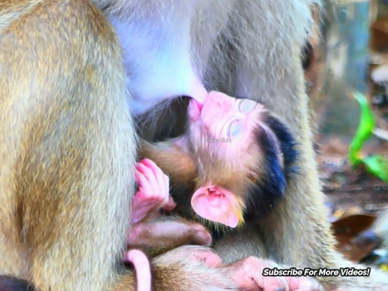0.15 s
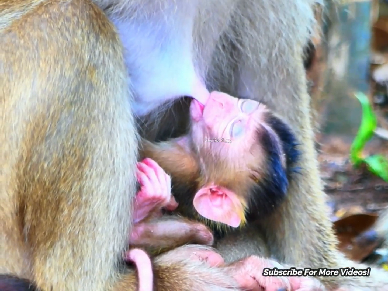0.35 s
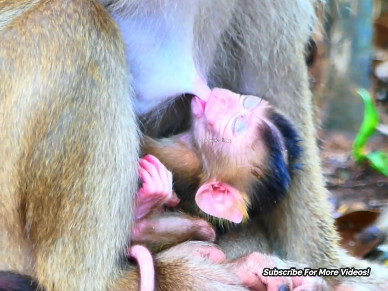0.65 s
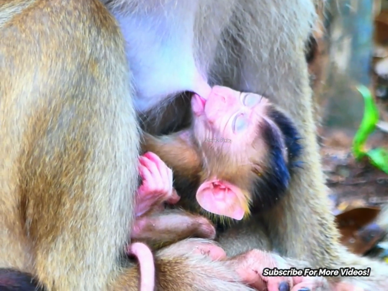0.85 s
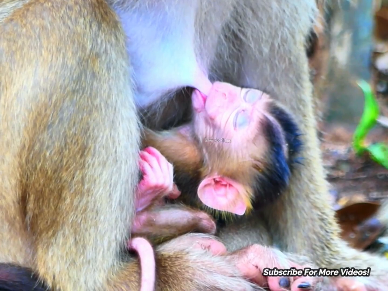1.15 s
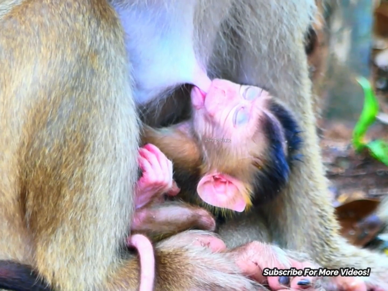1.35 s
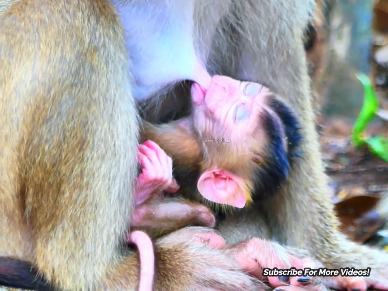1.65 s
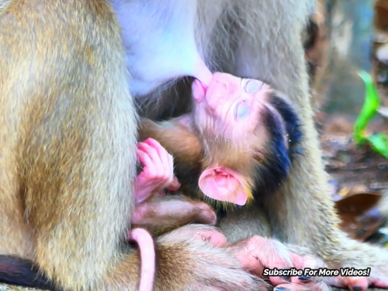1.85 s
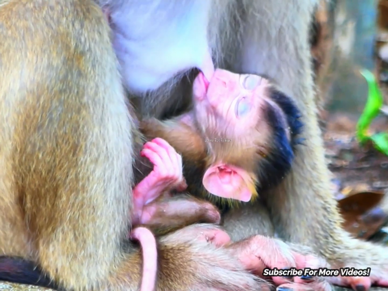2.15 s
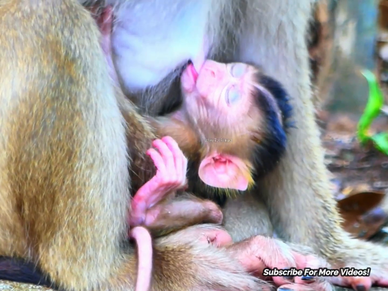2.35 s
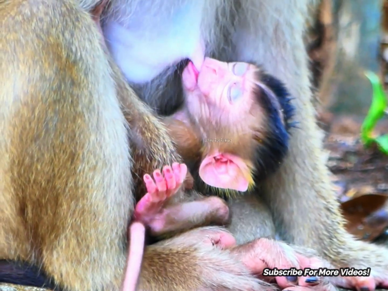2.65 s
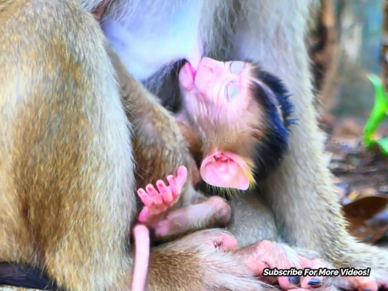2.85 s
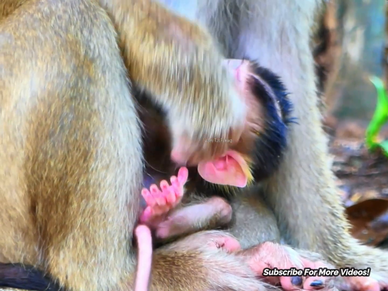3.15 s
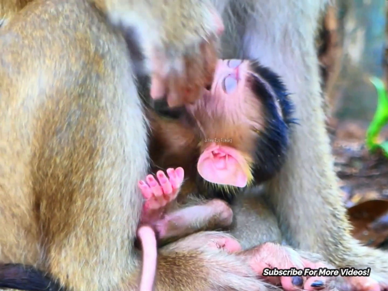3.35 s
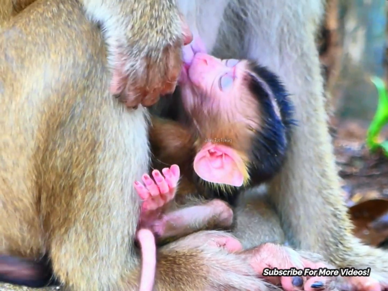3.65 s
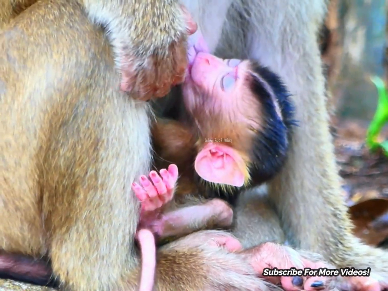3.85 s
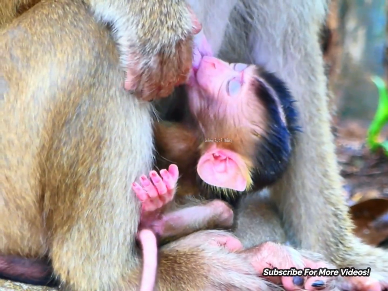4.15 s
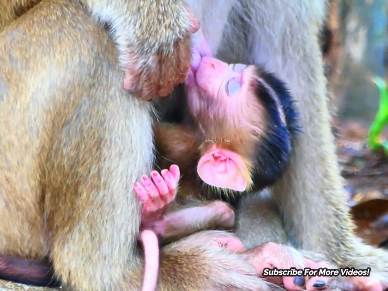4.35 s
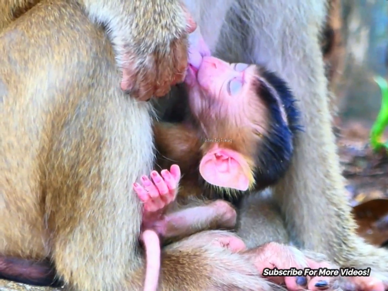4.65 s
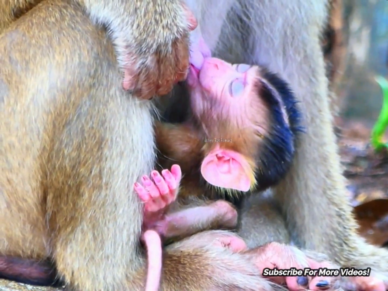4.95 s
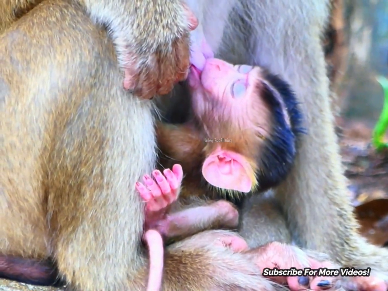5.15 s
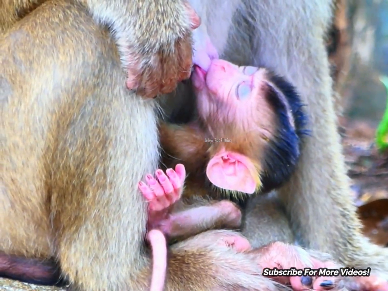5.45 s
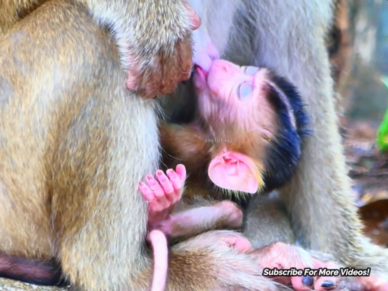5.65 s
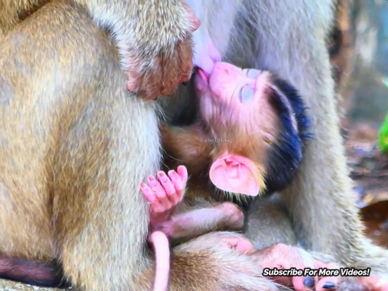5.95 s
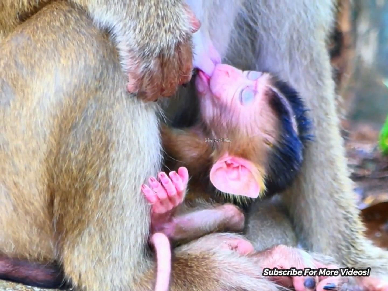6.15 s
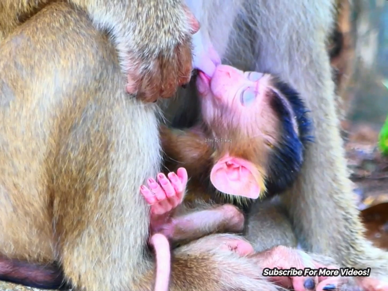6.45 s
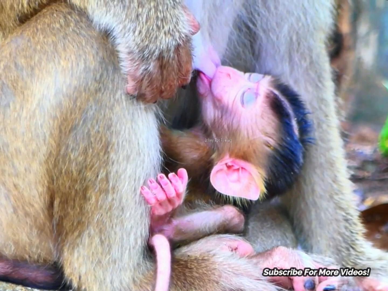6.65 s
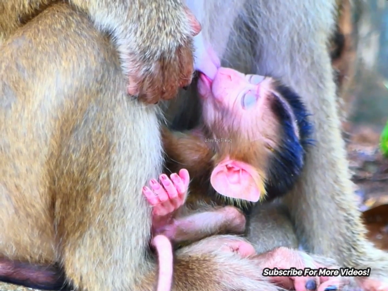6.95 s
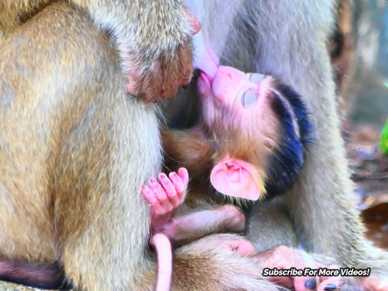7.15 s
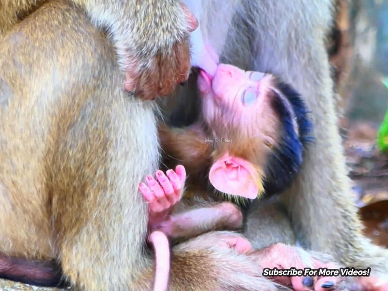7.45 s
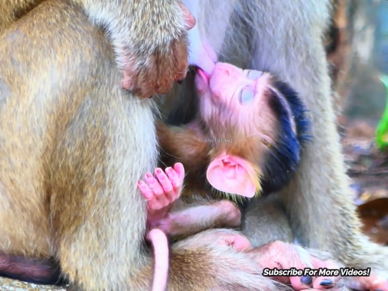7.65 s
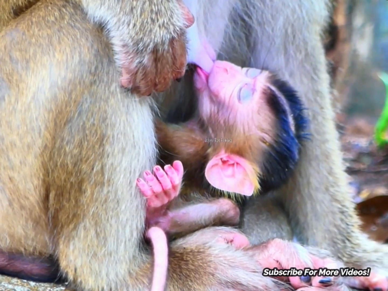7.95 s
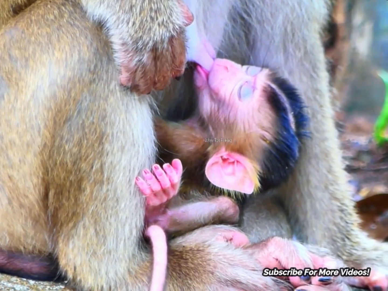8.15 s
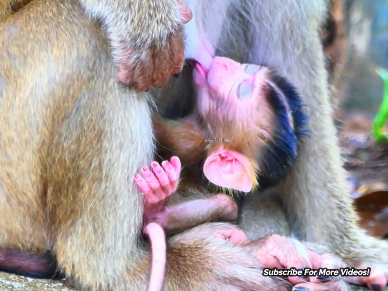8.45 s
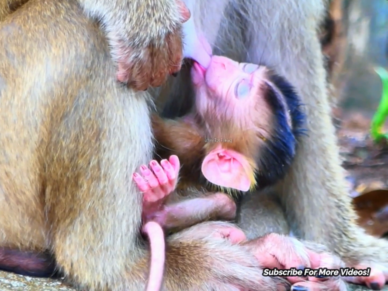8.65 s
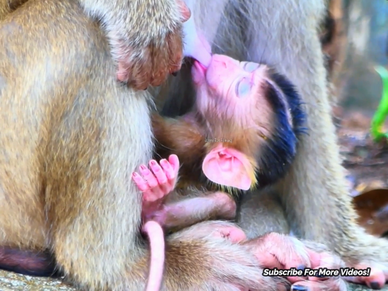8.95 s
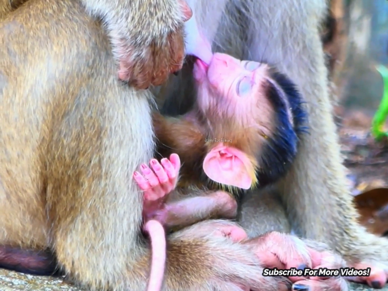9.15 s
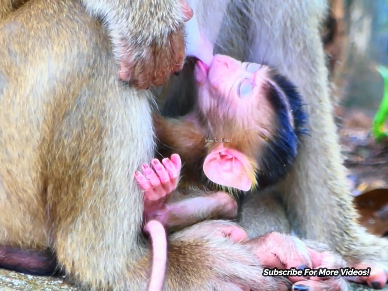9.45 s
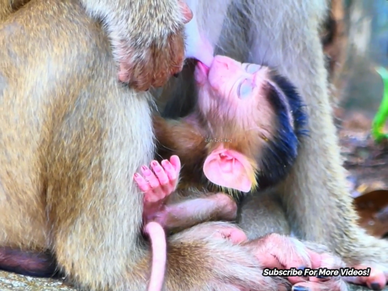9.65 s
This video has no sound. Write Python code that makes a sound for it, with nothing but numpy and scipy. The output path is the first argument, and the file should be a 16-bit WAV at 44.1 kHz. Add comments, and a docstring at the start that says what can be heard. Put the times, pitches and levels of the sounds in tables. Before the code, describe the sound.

Outdoor woodland birdsong: two bursts of rapid bright chirps, soft hoots to the left, sharp falling calls, faint insect tones and dry leaf ticks.

```python
"""Birds in a tropical wood

A near bird runs off quick rising chirps and low two-voiced chips; another hoots softly on the left.
Small birds further off slur falling whistles that ring among the trees: all are gliding, near-pure tones.
Dry leaves stir and tick as shaped noise, with a few hissing rasps made of noise through resonances,
over a soft outdoor wash of coloured noise and thin insect tones made of narrow bands of noise."""
import sys
import numpy as np
from scipy import signal
from scipy.fft import rfft, irfft, next_fast_len
from scipy.io import wavfile
from scipy.ndimage import uniform_filter1d, map_coordinates

SR = 44100
rng = np.random.default_rng(int(sys.argv[2]) if len(sys.argv) > 2 else 0)


def materialize(psi):
    """Save the field psi as 16-bit PCM at rate SR to the path in sys.argv[1].

    A 1-D psi becomes a single channel; in a 2-D psi each row is a channel.
    """
    bounded = np.clip(np.atleast_2d(psi).T, -1, 1)
    quanta = np.round(bounded * 32767).astype(np.int16)
    wavfile.write(sys.argv[1], SR, quanta)


N = 432621
TIME = np.arange(N) / SR  # t/s

# Source levels below apply before the note contours and the response of the wood.
# Note contours: share of the note's length, pitch (0 = low f, 1 = top f), level/dB
CHIRP_CONTOUR = [(0, 0, -23), (.2, .14, -14), (.45, .28, -8.5), (.63, .6, 0), (.82, 1, -2.5), (.92, .9, -6),
                 (1, .6, -16)]
CHIP_CONTOUR = [(0, 0, -17), (.2, .05, -11), (.34, .7, -3), (.43, 1, -3), (.58, .52, 0), (.8, .28, -5),
                (1, .2, -13)]
HOOT_CONTOUR = [(0, 0, -5), (.2, .8, 1), (.45, 1, 1), (.8, .7, 0), (1, .1, -5)]
TSEW_CONTOUR = [(0, .9, -21), (.3, 1, -11), (.52, .85, -3), (.78, .3, -5), (1, 0, -8)]
FALLING_CONTOUR = [(0, 0.94, -10), (0.298, 0.68, -9), (.58, 0.7, -10.5), (0.749, 0.39, -12),
                   (0.882, .12, -7.5), (0.999, -0.18, -17.5)]

# Rising chirps of the near bird, in two runs that warm up and close on a weak note:
# t/s, low f/Hz, top f/Hz, level/dB
CHIRPS = [(0.1, 2620, 3240, -15.5), (.169, 2660, 3368, -14), (.24, 2680, 3354, -13),
          (.312, 2720, 3286, -13), (.388, 2750, 3190, -12), (0.461, 2850, 3040, -24),
          (5.477, 2300, 3280, -24.5), (5.557, 2560, 3360, -15.5), (5.633, 2660, 3400, -13.5),
          (5.71, 2700, 3296, -13), (5.79, 2720, 3322, -15.5), (5.868, 2740, 3216, -25.5)]
CHIRP_S = .05
# A short, soft trial chirp before each run: t/s, length/s, low f/Hz, top f/Hz, level/dB
TRIAL_CHIRPS = [(.037, 0.0287, 2580, 3450, -23.5), (5.392, 0.033, 2300, 2730, -34.5)]
# Low arched chips, in two runs: t/s, length/s, top f/Hz, level/dB, upper voice relative to lower/dB
CHIPS = [(0.555, 0.023, 2645, -22.5, -6), (0.605, .027, 2550, -21, -27), (0.665, 0.03, 2535, -20, -30),
         (0.719, 0.031, 2420, -22, -16), (0.785, .027, 2480, -23.5, -25), (.864, .022, 2500, -37.5, -31),
         (3.964, 0.028, 2550, -47, 5.5), (4.012, 0.027, 2190, -33, -11), (4.074, 0.028, 2286, -27, -21),
         (4.144, 0.0234, 2464, -25.5, -14), (4.187, 0.04, 2020, -35, -14), (4.225, 0.021, 2490, -25, -7),
         (4.302, .022, 2710, -25, -20), (4.45, 0.025, 2630, -47, 2.5)]
CHIP_LOW_HZ, UPPER_VOICE_RATIO = 1568, 1.55
# A lower chirp in answer: t/s, length/s, low f/Hz, top f/Hz, level/dB
ANSWER = [(9.71, 0.0373, 1560, 2050, -32)]

# Hooted phrases: t/s, level/dB, level of the closing dip/dB
PHRASES = [(.05, -27.5, -32), (1.59, -30, -44.5), (5.15, -30.5, -32.5), (7.556, -33.5, -39)]
# Flourish that opens every phrase: t into the phrase/s, length/s, low f/Hz, top f/Hz, relative level/dB
FLOURISH = [(0, 0.034, 920, 998, -7), (.018, 0.035, 1134, 1236, 0), (.062, 0.084, 1131, 1210, -3)]
DIP_AFTER_S, DIP_S, DIP_LOW_HZ, DIP_TOP_HZ = .161, 0.021, 857, 1006  # a low dip ends the flourish
# Single hoots: t/s, length/s, level/dB
HOOTS = [(.3, 0.03, -31), (.412, 0.09, -32.5), (.675, .07, -34.5), (1.875, 0.077, -34.5),
         (2.08, 0.066, -37), (2.57, 0.1, -45), (5.52, .073, -39), (7.933, 0.075, -39.5)]
HOOT_LOW_HZ, HOOT_RISE_HZ_PER_S = 1087, 1200  # the longer a hoot, the higher it arches

# Sharp, steeply falling calls: t/s, length/s, low f/Hz, top f/Hz, level/dB
TSEWS = [(.49, .07, 3320, 4715, -33), (.522, 0.03, 3800, 4920, -27), (.982, 0.042, 4780, 6700, -21.5),
         (1.032, .056, 3740, 5000, -25), (1.585, 0.033, 3910, 4510, -31), (1.655, 0.023, 4990, 5860, -41),
         (2.603, 0.047, 4800, 6350, -23), (4.39, 0.03, 5870, 7200, -37), (4.918, 0.037, 4740, 6580, -25.5),
         (6.472, 0.051, 4670, 6530, -27), (8.118, 0.06, 4530, 6310, -27)]
# Long falling whistles: t/s, slide length/s, drop length/s, top f/Hz, slide level/dB, drop level/dB
SLURS = [(0, 0.11, 0.043, 5030, -48, -34), (.6, .11, 0.034, 4900, -52, -31.5),
         (1.282, 0.17, 0.028, 5020, -63, -44), (1.681, 0.094, 0.052, 4910, -56, -60),
         (2.041, 0.14, 0.062, 5150, -61, -41.5), (2.201, 0.096, 0.044, 5380, -50.5, -47),
         (2.388, 0.084, 0.024, 5160, -60, -55), (2.791, 0.14, 0.063, 5260, -51.5, -38.5),
         (3.219, 0.12, 0.047, 5370, -55, -76), (3.41, 0.14, 0.052, 5220, -54, -42),
         (3.677, 0.082, 0.051, 5540, -51.5, -49), (3.925, 0.053, 0.039, 5690, -60, -48),
         (4.218, 0.076, 0.033, 4750, -48, -46), (4.47, 0.13, 0.036, 5400, -53.5, -44),
         (5.08, 0.08, 0.03, 5300, -45, -48), (5.14, 0.094, 0.053, 5020, -45.5, -41),
         (5.519, .11, 0.044, 5430, -45, -41), (5.68, 0.051, 0.056, 5300, -52, -65),
         (5.83, 0.095, 0.034, 4930, -54, -40), (6.153, 0.15, 0.089, 5430, -47.5, -56),
         (6.58, .16, 0.028, 5030, -58.5, -43), (6.83, 0.17, 0.036, 5340, -53.5, -69),
         (7.19, 0.12, 0.0393, 5160, -52, -41), (7.55, 0.12, 0.033, 4710, -60, -46),
         (7.69, 0.14, 0.049, 5280, -46, -42), (8.21, 0.098, 0.058, 5390, -42.5, -37),
         (8.329, 0.088, 0.021, 5040, -50, -45), (8.845, 0.14, 0.086, 5310, -47, -39.5),
         (9.254, 0.083, 0.049, 5320, -50.5, -33), (9.662, 0.14, 0.027, 5300, -53.5, -44)]
SLUR_END_SHARE, SLUR_KNEE_SHARE = .63, .88  # last pitch and pitch at the knee, as shares of the top
SLUR_FADE_IN_DB, SLUR_FADE_OUT_DB = -12, -10.5  # first point against the slide, last against the drop
# Onsets of one tiny bird's peeps, about two a second: t/s
PEEP_TIMES = [.47, 1.24, 1.766, 2.275, 2.846, 3.322, 3.829, 4.774]
PEEP_S, PEEP_HZ, PEEP_DB = 0.0537, 7230, -49.5
PEEP_ARCH = 0.0393  # share by which a thin note rises and falls
# Stray thin notes of other small birds: t/s, length/s, top f/Hz, level/dB
THIN_NOTES = [(.06, 0.041, 7240, -48), (.465, 0.053, 5820, -40.5), (1.21, 0.029, 5890, -39.5),
              (1.52, 0.14, 6020, -47), (1.85, 0.058, 9580, -50.5), (3.7, .07, 9500, -57),
              (6.21, 0.058, 9600, -54), (7.92, 0.052, 9640, -55), (7.46, 0.091, 5660, -48),
              (9.2, 0.033, 4120, -44)]

# Far calls, short or held: t/s, length/s, low f/Hz, top f/Hz, level/dB
FAR_CALLS = [(3.0, 0.38, 1500, 1680, -58.5), (3.2, 0.18, 720, 820, -58), (3.52, 0.083, 1220, 1290, -54),
             (3.6, 0.98, 1668, 1712, -58), (4.68, 0.38, 1250, 1366, -56), (4.98, 0.071, 960, 1028, -50.5),
             (6.15, 0.21, 590, 684, -60), (6.2, 0.39, 1290, 1370, -58.5), (6.42, 0.15, 1020, 1120, -51.5),
             (6.8, 0.44, 941, 1035, -51), (8.32, 0.67, 943, 1055, -52)]
# Far, short falling calls: t/s, length/s, low f/Hz, top f/Hz, level/dB
FAR_DROPS = [(2.16, 0.075, 1850, 2305, -44), (4.42, 0.029, 1716, 2910, -35.5),
             (7.33, 0.095, 2034, 2690, -45), (9.28, 0.049, 1483, 1810, -38.5), (9.5, 0.05, 1386, 2134, -39)]
# Bouts of low, distant chatter: first t/s, last t/s, nominal top f/Hz, mean level/dB
CHATTER = [(0.9, 2.603, 2303, -68), (2.65, 3.95, 2200, -57.5), (5.995, 7.997, 2500, -78),
           (8.102, 9.248, 2706, -59)]

# Hissing rasps: t/s, length/s, level/dB
RASPS = [(0.678, 0.042, -42.5), (0.716, 0.059, -36.5), (.752, 0.021, -33.5), (5.901, 0.038, -37.5)]
# Resonances of a rasp: f/Hz, width/Hz, level/dB
RASP_RESONANCES = [(3700, 2400, -4.5), (5760, 370, -4), (6340, 310, -1.5), (9100, 730, -8),
                   (10470, 360, -13.5), (6100, 5500, -5)]
# Dry leaves stirring: t/s, length/s, level before colouring/dB
RUSTLES = [(0.2, 0.065, -42.5), (0.253, 0.037, -36), (1.863, 0.062, -68), (3.073, 0.066, -55.5)]
# Spectrum of the leaves: f/Hz, level/dB
LEAF_COLOUR = [(600, -38), (1000, 3), (2200, -12.5), (3700, 2), (5000, -8), (6700, -2), (8200, -12),
               (10600, -10.5), (11800, -31), (15000, -23)]
# Small dry ticks: t/s, level/dB, centre f/Hz, width/Hz
TICKS = [(0.208, -31, 10700, 2000), (5.022, -18.5, 4500, 1300), (6.972, -25.5, 8400, 9100)]
TICK_DECAY_S, TICK_GRIT_DB = 0.0028, -8.5  # the crumbling that follows each snap
# Soft scuffs and bumps: t/s, length/s, centre f/Hz, level/dB
BUMPS = [(3.59, 0.17, 149.4, -51.5), (3.58, 0.19, 313, -51), (5.513, .17, 65, -63), (9.741, 0.1, 1420, -39)]

# Spectrum of the outdoor wash: f/Hz, relative level per hertz/dB
WASH_COLOUR = [(15, -56.5), (25, -27.5), (119, -8), (215, -9), (289, -5), (523, -4), (1050, 1),
               (2420, -11.5), (3090, -17.5), (4750, -13), (5880, -23.5), (6550, -13), (7700, -17.5),
               (9810, -16), (15500, -18.5)]
WASH_DB = -50.93  # rms level of the wash before it swells
# Swell of the wash, used relative to each mean: t/s, lower middle level/dB, upper middle level/dB
SWELL = [(0.0, -60, -59.5), (0.63, -60, -55), (1.31, -62.5, -67.5), (2.65, -57.5, -64.5), (4.01, -59, -64),
         (4.2, -61, -58), (4.42, -62.5, -60.5), (6.5, -56.5, -63.5), (7.04, -60.5, -66.5), (7.69, -61, -59),
         (9.11, -60.5, -74.5), (9.8, -56.5, -50.5)]
# Thin insect tones: f/Hz, width/Hz
INSECTS = [(6600, 99), (7320, 320)]
# How the insects swell: t/s, low tone level/dB, high tone level/dB
INSECT_LEVELS = [(0, -65, -76), (4.1, -93, -90), (4.8, -81, -65), (5.3, -69, -63), (5.8, -66, -60),
                 (6.3, -76, -75), (6.7, -80, -66), (7.4, -64, -69), (8.101, -76, -89), (9.8, -83, -75)]
TOP_HZ = 15800


def near_bird():
    """Syrinx tones with a ground reflection: near chirps and chips, and one answer from the right."""
    notes = [(s, CHIRP_S, low, top, db) for s, low, top, db in CHIRPS] + list(TRIAL_CHIRPS)
    chirps = sing(notes, CHIRP_CONTOUR, waver=.013, flutter_db=1.6, overtone_db=-50, waver_rate=300)
    chips = sing(chip_notes(), CHIP_CONTOUR, waver=.015, flutter_db=1.2, overtone_db=-30, waver_rate=600)
    answer = sing(ANSWER, CHIRP_CONTOUR, waver=.025, flutter_db=2, overtone_db=-40, waver_rate=600)
    chirps_in_wood = woods(echoed(chirps, lag_s=0.011, db=-12), direct_db=-1.5, early_db=-8.5,
                           early_s=0.048, late_db=-15.5, late_t60=0.4, spread=0.56, right_db=-4)
    chips_in_wood = woods(echoed(chips, lag_s=.0062, db=-17), direct_db=-3.5, early_db=-8.5,
                          early_s=0.0099, late_db=-9.5, late_t60=0.31, spread=0.9, right_db=-3.0)
    answer_in_wood = woods(answer, direct_db=0.5, early_db=-7.0, early_s=0.033,
                           late_db=-10, late_t60=0.55, spread=0.84, right_db=9.0)
    return chirps_in_wood + chips_in_wood + answer_in_wood


def chip_notes():
    """Two simultaneous voices: a low arch and a second one at a fixed frequency ratio above it."""
    lower, upper = [], []
    for s, length, hz, db, upper_db in CHIPS:
        lower.append((s, length, CHIP_LOW_HZ, hz, db))
        upper.append((s, length, CHIP_LOW_HZ * UPPER_VOICE_RATIO, hz * UPPER_VOICE_RATIO, db + upper_db))
    return lower + upper


def hooting_bird():
    """Mellow, near-pure hoots placed well to the left by a level difference between channels."""
    hoots = sing(hoot_notes(), HOOT_CONTOUR, waver=.011, flutter_db=1.6, overtone_db=-31.5, waver_rate=86.0)
    return woods(hoots, direct_db=-10, early_db=-14, early_s=0.017,
                 late_db=-16.5, late_t60=0.5, spread=3.5, right_db=-12.5)


def hoot_notes():
    """Phrases share one flourish and dip; a single hoot's frequency range grows with its length."""
    notes = [(s, length, HOOT_LOW_HZ, HOOT_LOW_HZ + HOOT_RISE_HZ_PER_S * length, db)
             for s, length, db in HOOTS]
    for s, db, dip_db in PHRASES:
        notes += [(s + after, length, low, top, db + accent) for after, length, low, top, accent in FLOURISH]
        notes.append((s + DIP_AFTER_S, DIP_S, DIP_LOW_HZ, DIP_TOP_HZ, dip_db))
    return notes


def canopy_birds():
    """Small birds up in the trees: scattered sound is strong beside the direct sound."""
    tsews = sing(TSEWS, TSEW_CONTOUR, waver=.013, flutter_db=2.2, overtone_db=-45, waver_rate=700)
    slurs = sum(slur(*row) for row in SLURS)
    distant = sing(flock(0, N / SR, count=60, db=-58), FALLING_CONTOUR,
                   waver=.025, flutter_db=4, overtone_db=-48, waver_rate=400)
    peeps = sing(peep_notes(), HOOT_CONTOUR, waver=.016, flutter_db=3, overtone_db=-61, waver_rate=700)
    # stands of trunks throw each whistle back a moment later, splitting it into strands
    whistles = echoed(echoed(slurs, lag_s=.013, db=-6), lag_s=.032, db=-5)
    sharp_in_wood = woods(tsews + distant, direct_db=-7.5, early_db=0.5, early_s=0.048, late_db=-2.5,
                          late_t60=0.48, spread=0.34, right_db=0.8, bloom_s=0.011)
    whistles_in_wood = woods(whistles, direct_db=-2.8, early_db=-3.8, early_s=.038, late_db=-18,
                             late_t60=.55, spread=.5, right_db=-.5, bloom_s=.01)
    peeps_in_wood = woods(peeps, direct_db=-8.5, early_db=-5.0, early_s=0.058,
                          late_db=-19, late_t60=0.31, spread=.5, right_db=2.5)
    return sharp_in_wood + whistles_in_wood + peeps_in_wood


def slur(start, slide_s, drop_s, top_hz, slide_db, drop_db):
    """A piecewise frequency glide: a gentle slide that fades in, a knee, then a steep drop."""
    bend = slide_s / (slide_s + drop_s)
    knee = (SLUR_KNEE_SHARE - SLUR_END_SHARE) / (1 - SLUR_END_SHARE)
    contour = [(0, 1, slide_db + SLUR_FADE_IN_DB),
               (bend / 2, (1 + knee) / 2, slide_db),
               (bend, knee, slide_db),
               ((1 + bend) / 2, knee / 2, drop_db),
               (1, 0, drop_db + SLUR_FADE_OUT_DB)]
    note = (start, slide_s + drop_s, top_hz * SLUR_END_SHARE, top_hz, 0)
    return sing([note], contour, waver=.018, flutter_db=3.2, overtone_db=-40, waver_rate=700)


def peep_notes():
    """Slightly arched frequency glides: a series of very high peeps and a few stray notes."""
    series = [(s, PEEP_S, PEEP_HZ, PEEP_DB) for s in PEEP_TIMES]
    return [(s, length, hz * (1 - PEEP_ARCH), hz, db) for s, length, hz, db in series + list(THIN_NOTES)]


def far_calls():
    """Hoarse calls and low chatter far off: scattered sound outweighs the direct sound."""
    calls = sing(FAR_CALLS, HOOT_CONTOUR, waver=.04, flutter_db=3, overtone_db=-18, waver_rate=220)
    drops = sing(FAR_DROPS, FALLING_CONTOUR, waver=0.0476, flutter_db=2, overtone_db=-11.5, waver_rate=200)
    bouts = [flock(first, last, count=45, db=db, spread_db=2.5, length=.09, low_hz=.6 * hz, top_hz=hz)
             for first, last, hz, db in CHATTER]
    chatter = sing(np.vstack(bouts), CHIP_CONTOUR,
                   waver=0.0568, flutter_db=1.0, overtone_db=-51.0, waver_rate=260)
    return woods(calls + drops + chatter, direct_db=-7.0, early_db=-0.5, early_s=0.027,
                 late_db=-4.5, late_t60=0.25, spread=4.8, right_db=2.0)


def flock(first_s, last_s, count, db, spread_db=3, length=.15, low_hz=3600, top_hz=5200):
    """Many indistinct callers as a random process: one note per equal slot, varied in every property."""
    when, stretch, pitch, size = rng.random((count, 4)).T
    scale = 1 + .3 * (pitch - .5)
    starts = first_s + (last_s - first_s) * (np.arange(count) + when) / count
    levels = db + spread_db * (2 * size - 1)
    return np.column_stack([starts, length * (.5 + stretch), low_hz * scale, top_hz * scale, levels])


def rasps():
    """Resonant filtering: rough-grained noise concentrated in several bands."""
    out = np.zeros(N)
    for start, length, db in RASPS:
        count = int(length * SR)
        hiss = sum(undb(level) * band(hz, width_hz, count)[0] for hz, width_hz, level in RASP_RESONANCES)
        grainy = unit(hiss * undb(4 * walk(470, count)))
        add(out, start, undb(db) * grainy * signal.windows.tukey(count, .2))
    return woods(out, direct_db=-3.5, early_db=-6.5, early_s=0.033,
                 late_db=-10.5, late_t60=0.52, spread=0.54, right_db=2.0)


def leaves():
    """Leaf litter as short noise and impulse sources: crackly stirs, dry ticks and soft bumps."""
    stirs_in_wood = woods(shaped(leaf_stirs(), LEAF_COLOUR), direct_db=8.0, early_db=4.0, early_s=0.045,
                          late_db=0.5, late_t60=0.48, spread=0.47, right_db=1.5)
    ticks_in_wood = woods(leaf_ticks(), direct_db=-1, early_db=-4.5, early_s=0.054,
                          late_db=-9.0, late_t60=0.22, spread=1.2, right_db=-2.5)
    return stirs_in_wood + ticks_in_wood + soft_bumps()


def leaf_stirs():
    """Amplitude-modulated noise: rapid random level changes make a crackle that builds and fades."""
    out = np.zeros(N)
    for start, length, db in RUSTLES:
        count = int(length * SR)
        crackle = unit(rng.standard_normal(count) * undb(4.5 * walk(700, count)))
        add(out, start, undb(db) * crackle * signal.windows.tukey(count, .6))
    return out


def leaf_ticks():
    """Damped oscillation: a snap whose decay rate sets its bandwidth, with decaying noise as grit."""
    out = np.zeros(N)
    t = TIME[:SR // 20]
    for start, db, hz, width_hz in TICKS:
        snap = np.cos(2 * np.pi * hz * t) * np.exp(-t * width_hz)
        grit = undb(TICK_GRIT_DB) * band(hz, width_hz, len(t))[0] * np.exp(-t / TICK_DECAY_S)
        add(out, start, undb(db) * (snap + grit))
    return out


def soft_bumps():
    """Band-limited noise under a smooth envelope, independent in the two channels."""
    out = np.zeros((2, N))
    for start, length, hz, db in BUMPS:
        count = int(length * SR)
        add(out, start, undb(db) * band(hz, hz * 0.5, count) * np.hanning(count))
    return out


def outdoors():
    """A diffuse field: partly shared noise whose ranges swell and flicker, under the insect tones."""
    noise = rng.standard_normal((3, N))
    air = unit(shaped(noise[:2] + .55 * noise[2], WASH_COLOUR)) * undb(WASH_DB)
    # each range is the step between two low-pass splits, so together they make the whole wash
    below = []
    for hz in (200, 1300, 3200, 9000):
        low_pass = signal.butter(3, hz, fs=SR, output="sos")
        below.append(signal.sosfiltfilt(low_pass, air))
    lower, upper, treble = np.diff(below, axis=0)
    s, *swells = np.transpose(SWELL)
    middle = 0
    for part, db in zip((lower, upper), swells):
        middle = middle + part * undb(np.interp(TIME, s, db - np.mean(db)) + .8 * walk(12, N))
    top = (air - below[-1]) * pan(-2.0)
    hiss = (treble + top) * undb(.75 * walk(4.6, N))
    low_patches = patchy(below[0] + middle, depth_db=2.4, rate=7, per_octave=4)
    high_patches = patchy(hiss, depth_db=2.5, rate=16, per_octave=6)
    return low_patches + high_patches + insects()


def insects():
    """Narrow-band noise: thin tones with added random flutter and slow swells."""
    s, *levels = np.transpose(INSECT_LEVELS)
    return sum(undb(np.interp(TIME, s, db) + 3.5 * walk(14, N)) * band(hz, width_hz, N)
               for (hz, width_hz), db in zip(INSECTS, levels))


def sing(notes, contour, waver, flutter_db, overtone_db, waver_rate):
    """A syrinx: a near-pure tone by phase integration, with one contour and fresh wavering per note."""
    out = np.zeros(N)
    place, rise, loud_db = np.transpose(contour)
    for start, length, low_hz, top_hz, db in notes:
        count = int(length * SR)
        u = np.linspace(0, 1, count)
        glide = uniform_filter1d(np.interp(u, place, rise), count // 12 + 1, mode="nearest")
        hz = (low_hz + (top_hz - low_hz) * glide) * (1 + waver * walk(waver_rate, count))
        phase = 2 * np.pi * np.cumsum(hz) / SR
        level = db + np.interp(u, place, loud_db) + flutter_db * walk(waver_rate, count)
        gain = signal.windows.tukey(count, .18) * undb(level)
        add(out, start, gain * (np.sin(phase) + undb(overtone_db) * np.sin(2 * phase)))
    return out


def woods(x, direct_db, early_db, early_s, late_db, late_t60, spread, right_db, bloom_s=0.0013):
    """Impulse response of a wood: direct sound, scatter from ground and trunks, and a later ring."""
    t = np.arange(SR) / SR
    arrive = np.clip((t - 0.0035) / bloom_s, 0, 1)
    # lone trunks give separate echoes
    echoes = rng.standard_normal((3, SR)) * (rng.random((3, SR)) < .04)
    early = echoes * arrive * np.exp(-t / early_s)
    # trees beyond: dense noise that falls 60 dB in late_t60 seconds
    late = rng.standard_normal((3, SR)) * (1 - np.exp(-t / 0.0134)) * undb(-60 * t / late_t60)
    scatter = (undb(early_db) * unit(early) + undb(late_db) * unit(late)) / np.sqrt(SR)
    # one part common to both channels, and one of their own weighted by spread
    response = (scatter[0] + spread * scatter[1:]) / np.hypot(1, spread)
    response[:, 0] += undb(direct_db)
    return pan(right_db) * signal.fftconvolve(x[None], response, axes=1)[:, :N]


def echoed(x, lag_s, db):
    """Superposition of a sound and one distinct, delayed reflection of it."""
    out = x.copy()
    add(out, lag_s, undb(db) * x)
    return out


def patchy(x, depth_db, rate, per_octave):
    """Time-frequency modulation: a random map, in points per second and per octave, sets the level."""
    hz, s, frames = signal.stft(x, SR, nperseg=1024)
    place = np.meshgrid(per_octave * np.log2(1 + hz / 100), rate * s, indexing="ij")
    swell = map_coordinates(rng.standard_normal((64, 256)), place, order=1, mode="mirror")
    return signal.istft(frames * undb(depth_db * swell), SR)[1][..., :N]


def shaped(x, points):
    """Spectral weighting: a gain curve through (f/Hz, level/dB) points on a log frequency axis."""
    hz, db = np.transpose(points)
    size = next_fast_len(x.shape[-1])
    f = np.maximum(np.fft.rfftfreq(size, 1 / SR), 1)
    gain = undb(np.interp(np.log(f), np.log(hz), db))
    return irfft(rfft(x, size) * gain, size)[..., :x.shape[-1]]


def band(hz, width_hz, count):
    """Band-limited noise: two unrelated signals under one bell-shaped spectrum, at rms 1."""
    size = next_fast_len(count)
    bell = np.exp(-2 * ((np.fft.rfftfreq(size, 1 / SR) - hz) / width_hz) ** 2)
    return unit(irfft(rfft(rng.standard_normal((2, size))) * bell, size)[:, :count])


def walk(rate, count):
    """Low-pass random modulation: smoothed random steps, rate per second, with a spread near 1."""
    k = max(int(SR / rate), 1)
    steps = np.repeat(rng.standard_normal(count // k + 1), k)
    return uniform_filter1d(uniform_filter1d(steps, k), k)[:count] * np.sqrt(2)


def pan(right_db):
    """Interchannel level difference: left and right gains, positive towards the right."""
    return undb(np.array([[-right_db], [right_db]]) / 2)


def add(track, start, sound):
    """Superposition: mix a sound into a track at a time in seconds."""
    i = max(int(start * SR), 0)
    track[..., i:i + sound.shape[-1]] += sound[..., :max(N - i, 0)]


def unit(x):
    """Normalisation to an rms amplitude of 1."""
    return x / np.sqrt(np.mean(x ** 2))


def undb(db):
    """Logarithmic level to amplitude ratio: 20 dB is a factor of ten."""
    return 10 ** (np.asarray(db) / 20)


def scene():
    """Superposition of all the birds, the leaves and the air around them."""
    return near_bird() + hooting_bird() + canopy_birds() + far_calls() + rasps() + leaves() + outdoors()


def record(dry):
    """Steep elliptic low-pass filtering removes the very top of the spectrum."""
    return signal.sosfilt(signal.ellip(10, .2, 80, TOP_HZ, fs=SR, output="sos"), dry)


dry = scene()
out = record(dry)
materialize(out)
```